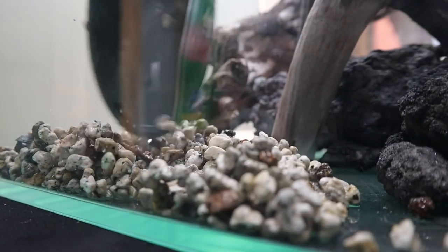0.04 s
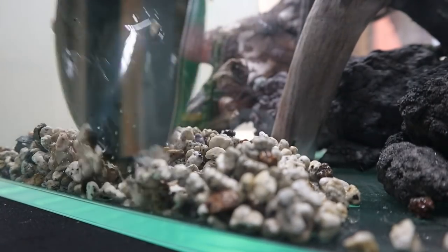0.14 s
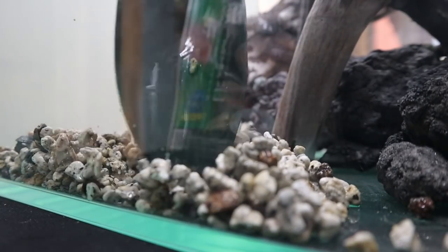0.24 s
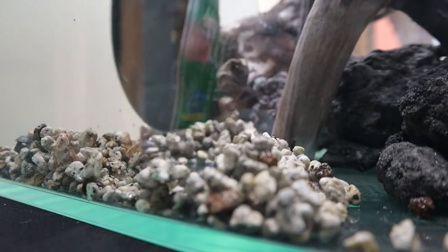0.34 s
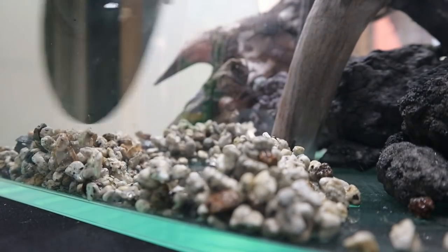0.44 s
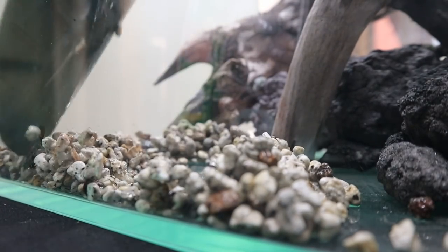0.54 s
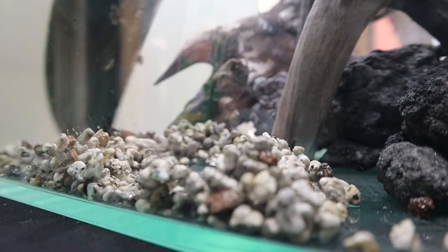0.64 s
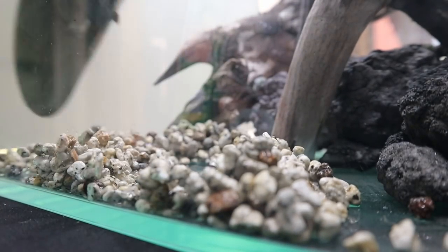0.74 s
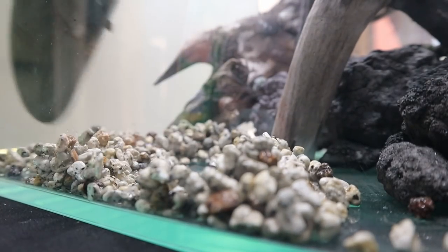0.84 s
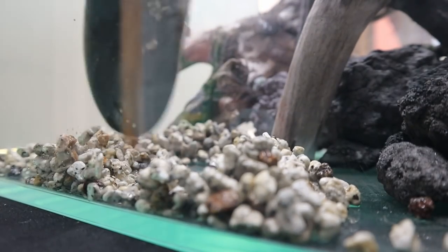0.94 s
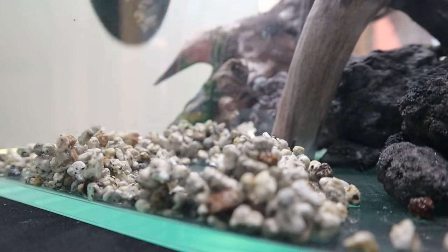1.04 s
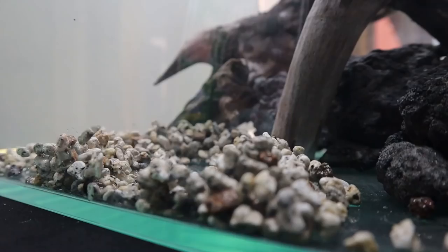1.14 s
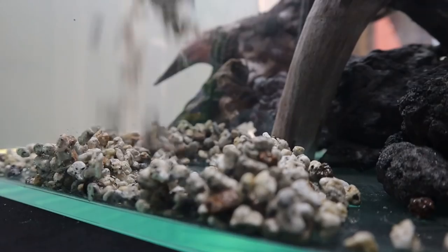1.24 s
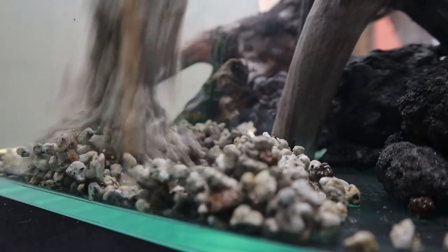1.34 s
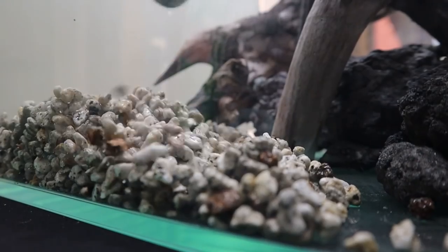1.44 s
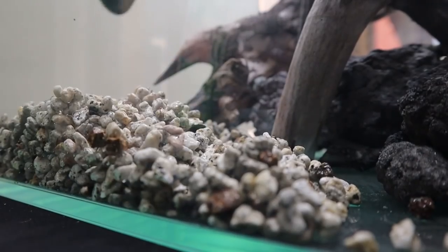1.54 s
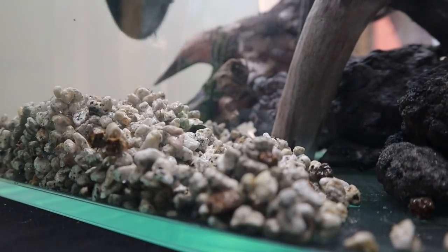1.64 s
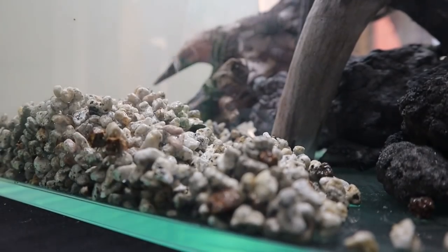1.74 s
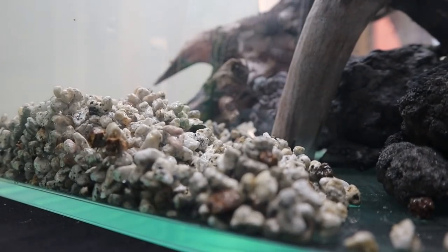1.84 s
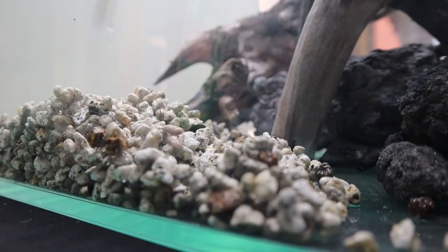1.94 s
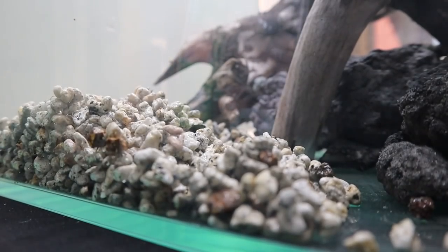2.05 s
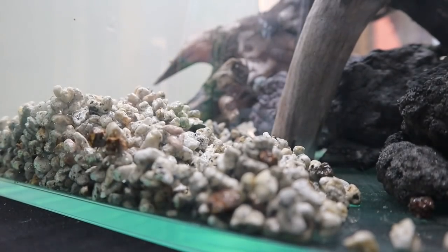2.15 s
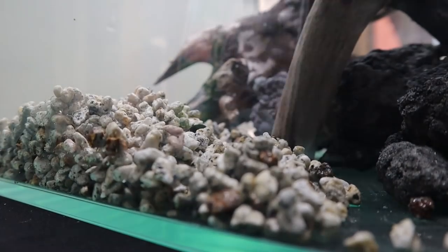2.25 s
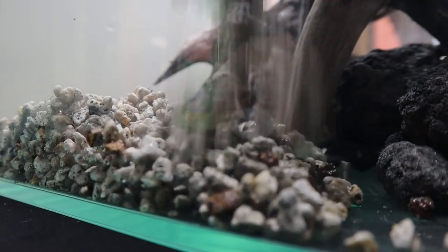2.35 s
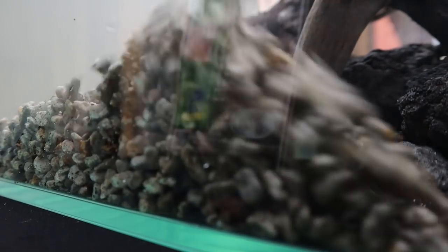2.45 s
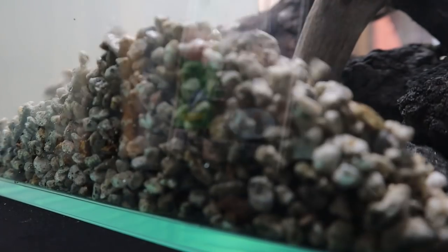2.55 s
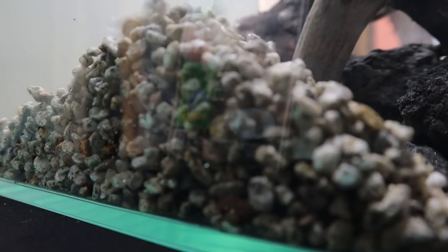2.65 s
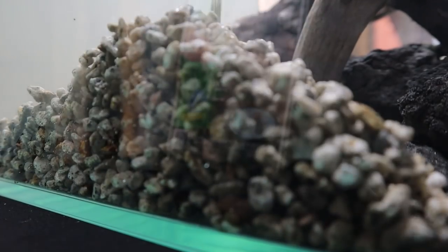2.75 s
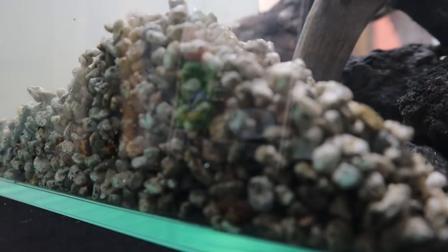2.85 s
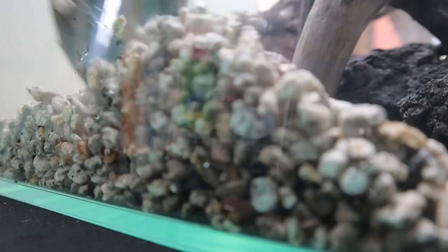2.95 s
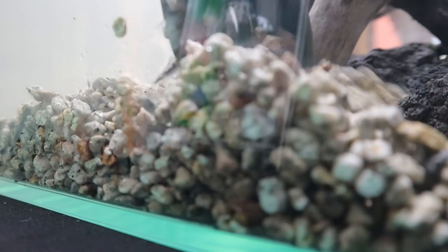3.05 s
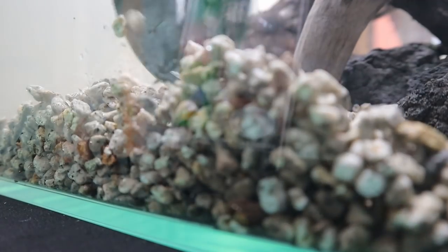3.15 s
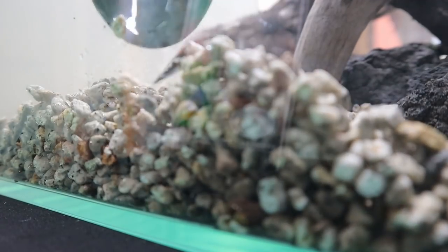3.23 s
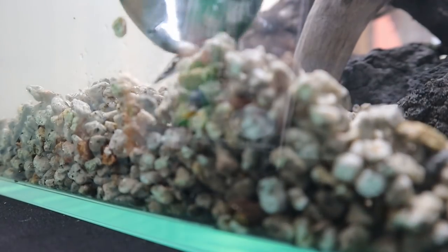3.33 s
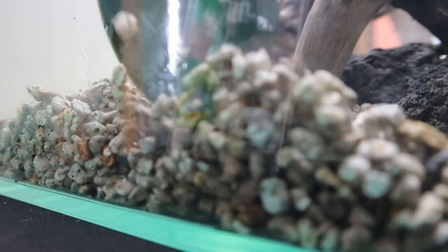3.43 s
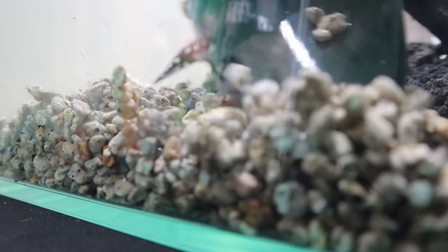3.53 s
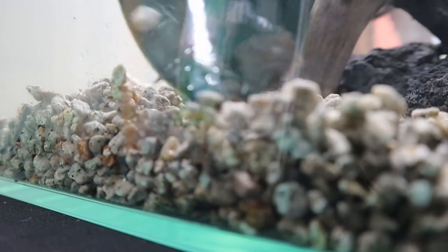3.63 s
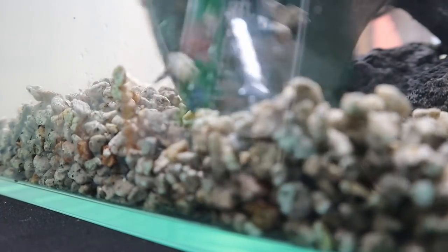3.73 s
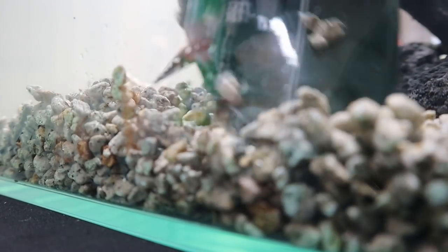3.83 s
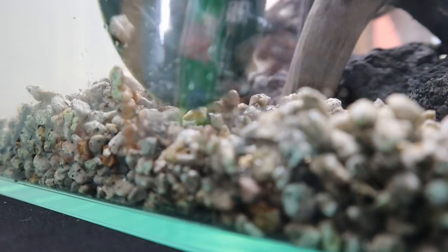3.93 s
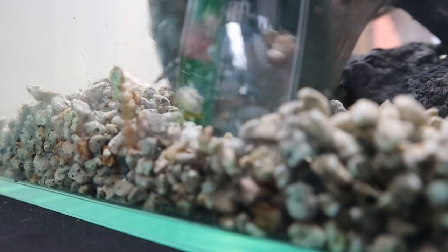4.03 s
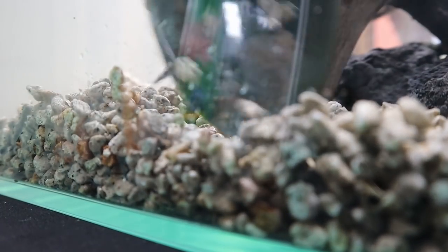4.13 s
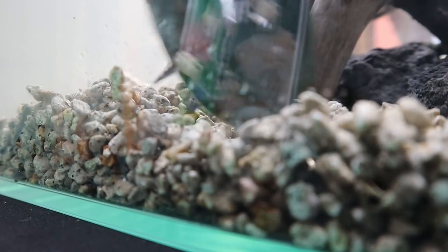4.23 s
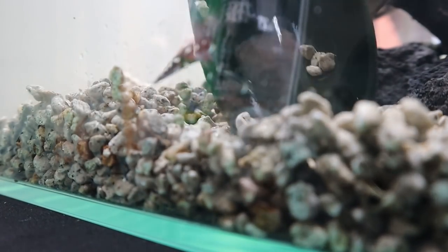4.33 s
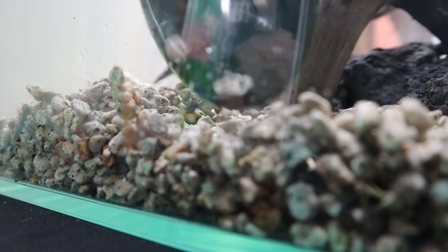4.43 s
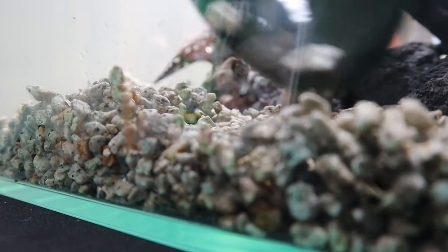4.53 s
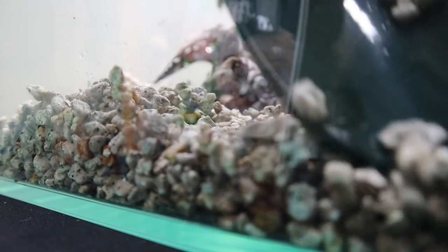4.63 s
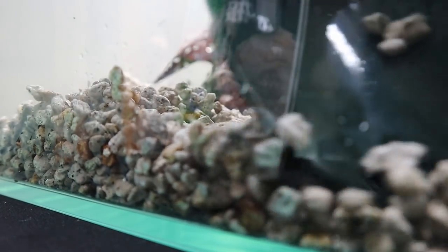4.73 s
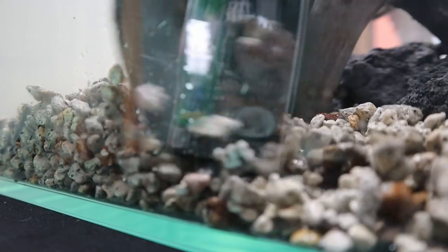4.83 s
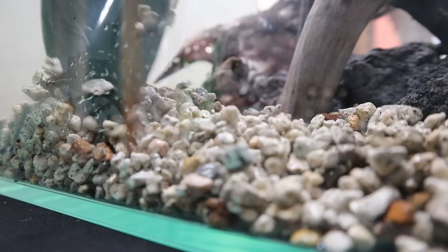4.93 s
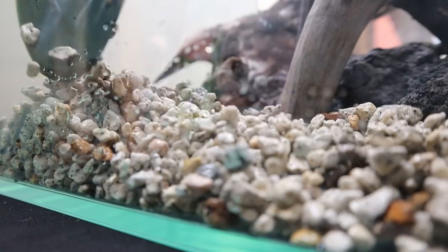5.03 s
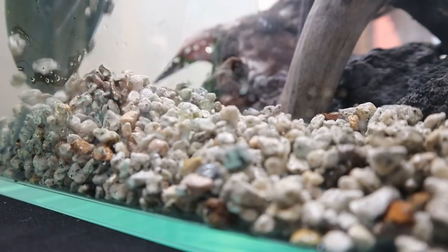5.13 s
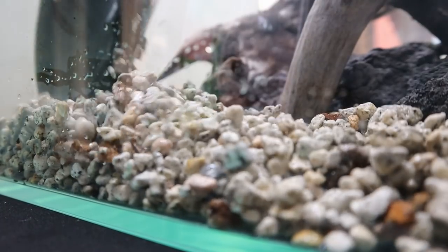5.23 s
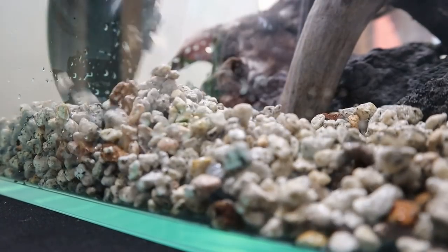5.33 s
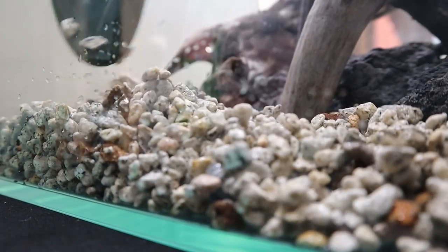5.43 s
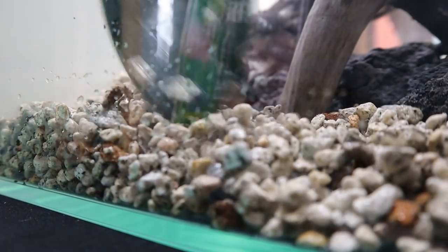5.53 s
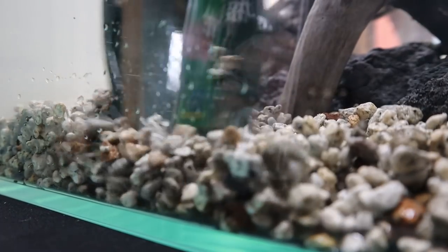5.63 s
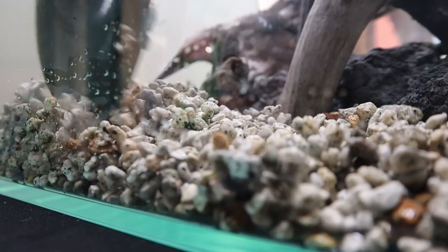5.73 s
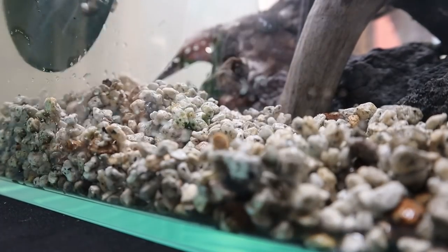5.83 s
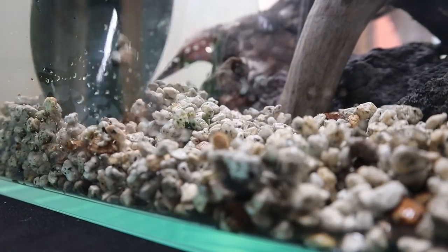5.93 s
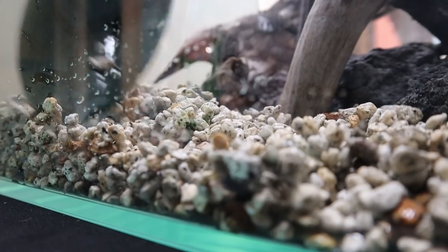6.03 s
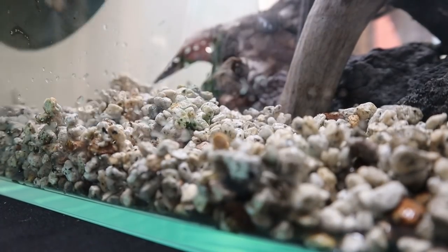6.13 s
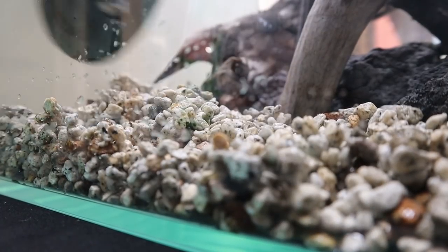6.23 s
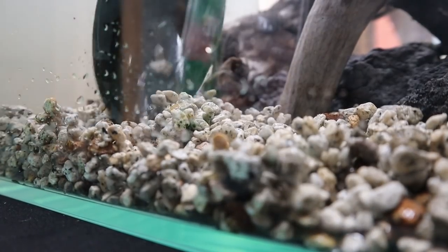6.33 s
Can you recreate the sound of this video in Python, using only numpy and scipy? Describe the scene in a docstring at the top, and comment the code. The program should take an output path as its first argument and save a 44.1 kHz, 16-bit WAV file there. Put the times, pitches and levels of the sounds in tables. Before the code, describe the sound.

Close to the side of a glass tank, small stones crunch and rattle as a metal scoop digs in. A load of gravel pours down, a few stones trickle after it, and a second load lands. The scoop then shoves the heap around in repeated strokes, knocking on the glass with a short steely ring and dull thuds from the tank. A faint mains hum lies under the quiet indoor background.

```python
"""Gravel slides and clatters as a steel scoop pours, pushes and rakes it in an empty glass tank.
Heard from close to the pane, the stones click on each other and make the scoop ring, while their
weight thuds into blade and tank and rocks the tank on its stand. Stones give short rattles, and the
scoop knocks on the heap or cracks against the glass, its blade shuddering after the hardest knocks.
A quiet room with a faint mains hum lies underneath."""
import sys
import numpy as np
from scipy import signal
from scipy.fft import rfft, irfft
from scipy.io import wavfile

SR = 44100
rng = np.random.default_rng(int(sys.argv[2]) if len(sys.argv) > 2 else 0)


def log_audio(samples):
    """Write samples as a 16-bit WAV file to the path given in sys.argv[1]."""
    # one column per channel
    frames = np.atleast_2d(samples).T
    # limit to full scale, then quantise
    limited = np.clip(frames, -1, 1)
    pcm = np.round(limited * 32767).astype(np.int16)
    wavfile.write(sys.argv[1], SR, pcm)


N = 281181


# Slides of gravel, and the scoop's blade shuddering after its two hardest knocks.
# Each row: start in seconds, swell time in ms, rise during the swell in dB, hold in ms,
# fade in dB per second, then full levels in dB of clatter, tank thud, blade flex and rocking.
SLIDES_AND_SHUDDERS = [(0.0, 40, -9, 43, 113, -36, -32, -41, -53.5),
                       (0.179, 6.9, 5.5, 16, 296.5, -24, -28, -31.5, -47),
                       (0.257, 63, 2.5, 44, 120, -27, -25, -49, -52),
                       (0.569, 10, 7, 29, 250, -39, -45, -25, -52.5),
                       (0.61, 36, 4.5, 73, 188, -25.5, -22.5, -25.5, -44),
                       (0.985, 6.3, 9, 9.2, 250, -38, -36, -40, -57),
                       (1.07, 35, -7.5, 68, 200, -45.5, -60, -64, -67),
                       (1.175, 19, 17, 40, 51, -38, -32, -36.5, -52.5),
                       (1.303, 152.6, 16, 38, 292, -20.5, -16.5, -24.5, -55),
                       (1.83, 120, 10, 30, 200, -41, -46, -60, -74),
                       (2.062, 26, -9.5, 63, 266, -43.5, -43.5, -42.5, -67),
                       (2.262, 10, -3, 130, 250, -39, -54, -54, -69),
                       (2.371, 9.2, 9, 120, 250, -28, -23, -38, -52.5),
                       (2.42, 58.3, 42, 24, 200, -12.5, -22, -17.5, -55),
                       (2.56, 32, 15, 18, 284, -22.5, -25.5, -25, -51),
                       (2.696, 30, 2, 7.7, 300, -36.5, -30.5, -33, -65.5),
                       (2.839, 18, -7, 30, 250, -54, -39.5, -53, -66),
                       (2.91, 12, 6, 9.1, 400, -51, -37, -28, -62),
                       (2.981, 20.6, 20, 112, 123, -24.5, -26.5, -25.5, -50.5),
                       (3.416, 30, 12, 125, 150, -24.5, -26.5, -23, -51),
                       (3.682, 23, 2, 2.3, 595, -28, -34.5, -31.5, -47.5),
                       (3.73, 10, 3, 67, 200, -71, -40, -29.5, -62),
                       (3.783, 16, 19, 52, 222, -28.5, -28.5, -32, -49.5),
                       (3.935, 7.1, 2, 13, 300, -39, -46, -41, -53),
                       (4.038, 44, 13, 38, 237, -28.5, -24, -31, -49),
                       (4.327, 36, 10.5, 8.5, 173, -28.5, -23, -28, -45.5),
                       (4.633, 91, 16, 37, 265, -23.5, -24, -20, -46.5),
                       (4.817, 49, 2, 94, 172, -24, -28.5, -24.5, -52.5),
                       (5.058, 29, 6, 37, 254, -43.5, -45, -35, -61),
                       (5.158, 158, 27, 25, 273, -21.5, -18.5, -22, -45),
                       (5.623, 46, 14, 11.3, 276, -16.5, -15.5, -28.5, -44),
                       (5.723, 20, 1, 20, 183, -22, -25, -22.5, -51),
                       (6.004, 32, 8, 17, 220, -26, -27, -31, -53),
                       (6.09, 24, 7, 8.7, 600, -26.5, -35, -34, -51),
                       (6.15, 8.4, 0, 47, 200, -63, -33, -28, -58),
                       (6.204, 28, 12, 8.5, 254, -30, -47, -34.5, -51)]

def layer_forces(onset_ms=1.4, straggler_db=-18.5, straggler_fade_db_per_s=60):
    """Each slide or shudder sets in, swells, holds and settles; gives a force for each of four layers."""
    t, energy = np.arange(N) / SR, np.full((4, N), 1e-12)
    for start_s, swell_ms, rise_db, hold_ms, fade_db_per_s, *layer_db in SLIDES_AND_SHUDDERS:
        age = t - start_s
        swell = undb(-rise_db * np.clip(1 - 1000 * age / max(swell_ms, 1), 0, 1))
        rise = (np.clip(1000 * age / onset_ms, 0, 1) * swell) ** 2
        settling_s = np.maximum(age - (swell_ms + hold_ms) / 1000, 0)
        energy += np.outer(undb(2 * np.array(layer_db)), rise * undb(-2 * fade_db_per_s * settling_s))
        # the last light stones roll on, in the clatter only
        energy[0] += rise * undb(2 * (layer_db[0] + straggler_db - straggler_fade_db_per_s * settling_s))
    return np.sqrt(energy)


# The notes of the scoop's blade as it bends. Each row: pitch in Hz, width in Hz (wider dies sooner).
BLADE_NOTES = [(326, 30), (761, 25), (992, 40), (1408, 40), (1526, 40), (1699, 45)]
# How strong those notes are. Each entry: level in dB, in the same order.
BLADE_LEVELS = [6.5, 1, -7, -11.5, -2.5, -11]

def blade_notes():
    """The steel blade bends in several ways, each with its own pitch, width and level."""
    return [(*note, db) for note, db in zip(BLADE_NOTES, BLADE_LEVELS)]


# The tone of bare stone hitting stone. Each row: frequency in Hz, level in dB.
STONE_TONE = [(300, -14), (900, 1), (2000, 1.5), (4000, 1), (6500, 0), (10000, -6.5), (16000, -16)]
# The ringing notes of the scoop's bowl. Each row: pitch in Hz, width in Hz, level in dB.
BOWL_NOTES = [(2090, 76, -4), (2610, 44, -4), (3420, 90, -5), (4840, 50, 0), (5180, 130, -8),
              (5580, 100, -6), (6100, 52, 0), (6520, 46, -2), (7150, 89, -5), (7660, 140, -11),
              (8090, 72, -8), (9280, 46, -9), (9520, 100, -9), (10700, 58, -7), (11100, 42, -14),
              (11900, 43, -13), (13000, 34, -16), (13900, 70, -15)]

def clatter(force, ring_db, blade_db=-6):
    """Hard surfaces click on each other and set the steel of the scoop ringing."""
    noise = rng.standard_normal(N)
    clicks = colour(force * noise, STONE_TONE) / np.std(colour(noise, STONE_TONE))
    bowl = highpass(shake(force, BOWL_NOTES), hz=1730)
    blade = highpass(shake(force, blade_notes()[1:]), hz=620)
    steel = bowl + undb(blade_db) * blade
    return (clicks + undb(ring_db) * steel) / np.sqrt(1 + undb(2 * ring_db))


# The notes of the tank's air and panes. Each row: pitch in Hz, width in Hz, level in dB.
TANK_NOTES = [(495, 25, -29.5), (549, 40.8, 4), (607, 6.7, -1), (846, 35, -7)]

def thuds(tank_force, blade_force):
    """Heavier jolts make the tank thud and the blade shudder."""
    tank = shake(tank_force * contacts(per_s=400, spread_db=2.5, decay_s=.003), TANK_NOTES)
    blade = shake(blade_force * contacts(per_s=300, spread_db=2.5, decay_s=.003), blade_notes())
    return highpass(tank + blade, hz=290)


# The low notes of the tank on its stand. Each row: pitch in Hz, width of each filter in Hz, level in dB.
STAND_NOTES = [(52.3, 8.5, 5), (160.2, 41, 9)]

def tank_rocking(weight):
    """Shifting weight rocks the heavy tank; two ringing filters in a row make it answer late."""
    rocking = 0
    for hz, width, db in STAND_NOTES:
        noise = rng.standard_normal(N)
        sway = lambda force: resonate(resonate(force, hz, width), hz, width)
        rocking += undb(db) * sway(weight * noise) / np.std(sway(noise))
    return rocking


# The clatter's fizz, higher while stones are poured. Each row: time in seconds, treble lift in dB.
CLATTER_FIZZ = [(0, -0.5), (0.8, -0.5), (1.5, 2), (2.6, 1), (3.8, -1.5), (4.6, 0.1), (6.38, -1.5)]

def slides_and_shudders():
    """Moving gravel makes a dense clatter; below it the blade shudders and the tank thuds and rocks."""
    stone_force, tank_force, blade_force, weight = layer_forces()
    stones = clatter(stone_force * contacts(per_s=2100, spread_db=6, decay_s=.01), ring_db=-1.5)
    fizz_db = np.interp(np.arange(N) / SR, *np.transpose(CLATTER_FIZZ))
    return brighten(stones, fizz_db) + thuds(tank_force, blade_force) + tank_rocking(weight)


# The tone of the room's noise. Each row: frequency in Hz, relative level in dB.
ROOM_TONE = [(18, -48), (30, -25), (124, -6), (233, -13), (345, 2.5), (426, -5.5), (554, 2), (684, 0.5),
             (6380, -18.5), (16000, -36)]

def room(hum_hz=119.5):
    """Steady room noise with a mains hum."""
    hum = np.sin(2 * np.pi * hum_hz * np.arange(N) / SR)
    noise = colour(rng.standard_normal(N), ROOM_TONE)
    return set_level(noise, db=-41.5) + set_level(hum, db=-54.5)


# Short rattles of stones, and the sharp crack of the scoop knocking on glass.
# Each row: start in seconds, strength in dB.
RATTLES_AND_CRACKS = [(0.049, -15), (0.188, -2.5), (0.199, -4), (0.225, -15.5), (0.263, -20), (0.306, -17),
                      (0.5725, -18), (0.6261, -10.5), (0.9906, -22.5), (1.15, -29), (1.312, -30),
                      (1.394, -33), (1.451, -3.5), (1.4635, 0), (1.4883, -1.5), (1.834, -27.5),
                      (1.917, -26.5), (1.971, -23.5), (2.01, -25.5), (2.0636, -14.5), (2.1027, -21),
                      (2.114, -24), (2.121, -17.5), (2.127, -21.5), (2.1534, -17.5), (2.376, -10.5),
                      (2.423, -32), (2.4687, -21), (2.481, -24), (2.6167, -9), (2.6673, -23), (2.7327, -17),
                      (2.889, -34.5), (2.925, -21), (3.016, -13), (3.295, -36), (3.434, -23),
                      (3.702, -11.5), (3.7185, -24), (3.8018, -18.5), (3.9417, -24), (3.9823, -34),
                      (4.0447, -27.5), (4.33, -29), (4.606, -38), (4.6862, -33), (4.715, -18), (4.93, -15),
                      (5.3168, -11), (5.657, -17), (5.739, -10), (5.86, -25), (5.916, -29.5), (6.117, -13),
                      (6.1395, -25), (6.231, -19)]

def rattles_and_cracks(rise_ms=1.38, decay_ms=4):
    """Each sudden hit of stones or scoop is a quick, bright burst that dies away."""
    t, energy = np.arange(N) / SR, np.zeros(N)
    for start_s, strength_db in RATTLES_AND_CRACKS:
        part = slice(int(start_s * SR), int((start_s + .3) * SR))
        age_ms = np.maximum(1000 * (t[part] - start_s), 0)
        rise = 1 - np.exp(-age_ms / rise_ms)
        energy[part] += (undb(strength_db) * rise * np.exp(-age_ms / decay_ms)) ** 2
    return brighten(clatter(np.sqrt(energy), ring_db=2), db=2.5)


# Blunt blows of the scoop on glass or heap. Each row: start in seconds, strength in dB,
# contact time in ms, the tank's share in dB, the share of the blade's lowest note in dB.
SCOOP_BLOWS = [(0.208, -0.5, 0.57, -26, 2.5), (0.223, -18.5, 0.37, -17, 19.5), (0.263, -10, 0.46, 9, 9),
               (0.284, -6.5, 0.9, 13, -13), (0.303, -15, 0.13, 15, 24.5), (0.586, 2, 0.17, -15, 1.5),
               (0.989, -14.5, 0.43, 8.5, 0), (1.183, -15.5, 1, 10, 13), (2.422, -3.5, 0.18, -24, -28),
               (2.985, -14, 0.3, -8, 10), (3.433, -13, 0.38, -26, 1), (3.453, 9, 0.68, -18, -1),
               (3.469, -14, 0.27, -11, 15), (3.485, -11, 0.097, -27, 17), (3.7196, 13.5, 0.16, -19, -10),
               (3.982, 11, 0.22, -15, -0.5), (4.606, 8, 0.25, -6, 6), (4.932, -11, 0.42, -5, 15),
               (5.095, -10, 0.16, -13, 6.5), (5.667, 0.5, 0.6, 6, -10), (6.011, -27, 0.29, -1, -5),
               (6.1403, 12, 0.19, -21.5, -11)]

def scoop_knocks(bowl_db=-8, after_ring_db=-19.5):
    """A short push rings the tank and the scoop, which the contact damps; a longer push sounds duller."""
    click = signal.unit_impulse(SR // 4)

    def ring(notes, damping):
        return sum(undb(db) * width * resonate(click, hz, damping * width) for hz, width, db in notes)

    blade = blade_notes()
    flex, tank = ring(blade[:1], damping=1.17), ring(TANK_NOTES, damping=1)
    steel = ring(blade[1:], damping=1.6) + undb(bowl_db) * ring(BOWL_NOTES, damping=1.17)
    steel += undb(after_ring_db) * ring(blade[1:], damping=.44)  # the blade rings on after the contact
    steel_peak = np.abs(steel).max()
    out = np.zeros(N + SR)
    for start_s, strength_db, contact_ms, tank_db, flex_db in SCOOP_BLOWS:
        span = contact_ms * SR / 1000
        push = np.sin(np.pi * (np.arange(int(span) + 1) + .5) / (span + 1))  # half a sine wave
        knock = np.convolve(push / push.sum(), steel + undb(tank_db) * tank + undb(flex_db) * flex)
        out[int(start_s * SR):][:len(knock)] -= undb(strength_db) * knock / steel_peak
    return highpass(out[:N], hz=290)


def echo(x, fade_s=.14, build_s=.0023, echo_db=-13):
    """The tank walls and the room add a dull, noisy tail."""
    t = np.arange(SR // 2) / SR
    tail = rng.standard_normal(len(t)) * undb(-60 * t / fade_s) * np.minimum(t / build_s, 1)
    tail = signal.lfilter([1], [1, -.45], tail)  # softens the treble
    return x + signal.fftconvolve(x, undb(echo_db) * tail / np.sqrt(np.sum(tail ** 2)))[:N]


def contacts(per_s, spread_db, decay_s):
    """The force of many small hits at random moments, each dying quickly."""
    size = undb(spread_db * np.minimum(rng.exponential(size=N), 4))
    hits = rng.random(N) < per_s / SR
    energy = signal.lfilter([1], [1, -np.exp(-2 / (decay_s * SR))], hits * size ** 2)
    return np.sqrt(energy / energy.mean())


def shake(force, notes, wander_db=3, wanders_per_s=25):
    """Hits keep landing on new spots, so each note gets its own wandering share of the force."""
    power = sum(undb(2 * db) * width * SR / (4 * np.pi) for _, width, db in notes)
    steps = np.arange(N) * wanders_per_s / SR
    out = 0
    for hz, width, db in notes:
        share = np.interp(steps, np.arange(400), undb(wander_db * rng.standard_normal(400)))
        out += undb(db) * width * resonate(force * share * rng.standard_normal(N), hz, width)
    return out / np.sqrt(power)


def resonate(x, hz, width):
    """Rings at one pitch and dies away."""
    pole = np.exp((2j * np.pi * hz - np.pi * max(width, 5)) / SR)
    return signal.lfilter([1], [1, -pole], x).imag


def colour(x, points):
    """Shapes bass and treble along a curve of (Hz, dB) points."""
    hz, db = np.transpose(points)
    grid_hz = np.maximum(np.arange(2049) * SR / 4096, 1)
    log_gain = np.interp(np.log(grid_hz), np.log(hz), db) * np.log(10) / 20
    cepstrum = irfft(log_gain)
    # folding the second half onto the first keeps the filter from sounding before a hit
    cepstrum[1:2048] *= 2
    cepstrum[2049:] = 0
    return signal.fftconvolve(x, irfft(np.exp(rfft(cepstrum))))[:N]


def brighten(x, db):
    """Lifts the fizz above 8 kHz, or lowers it if db is negative."""
    dull = signal.sosfilt(signal.butter(2, 8000, fs=SR, output="sos"), x)
    return dull + undb(db) * (x - dull)


def highpass(x, hz):
    """Cuts the bass steeply."""
    return signal.sosfilt(signal.butter(4, hz, "high", fs=SR, output="sos"), x)


def undb(db):
    """Turns decibels into a multiplier."""
    return 10 ** (np.asarray(db) / 20)


def set_level(x, db):
    """Scales a sound to an average (rms) level."""
    return x * undb(db) / np.sqrt(np.mean(x ** 2))


def scene():
    """Gravel and scoop echo over the quiet room, in one channel."""
    return (echo(slides_and_shudders() + rattles_and_cracks() + scoop_knocks()) + room())[None]


def record(dry, top_hz=16250):
    """Rounds off the loudest peaks at full scale and cuts the highest treble."""
    rounded = dry / (1 + np.abs(dry) ** 4) ** (1 / 4)
    return signal.sosfilt(signal.ellip(12, .2, 80, top_hz, fs=SR, output="sos"), rounded)


dry = scene()
out = record(dry)
log_audio(out)
```